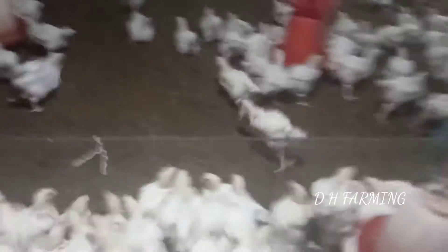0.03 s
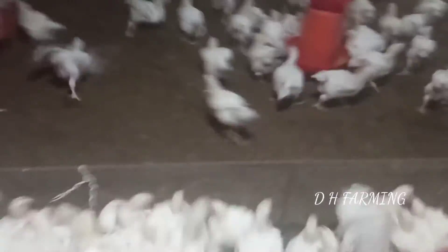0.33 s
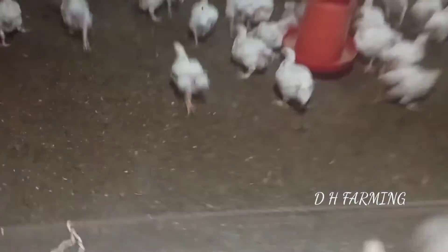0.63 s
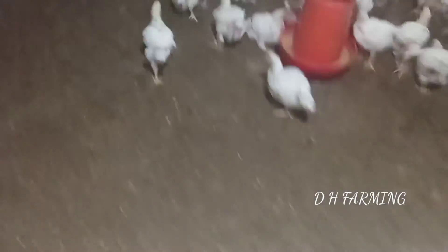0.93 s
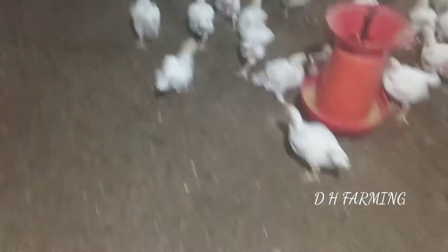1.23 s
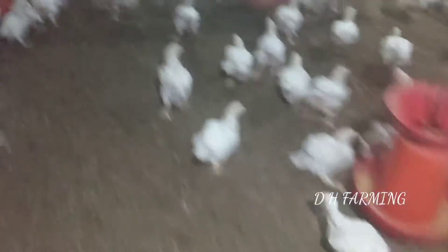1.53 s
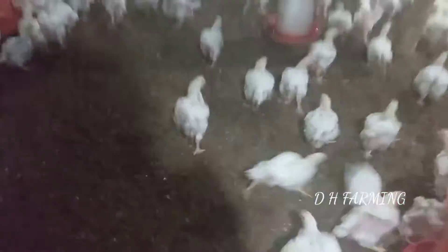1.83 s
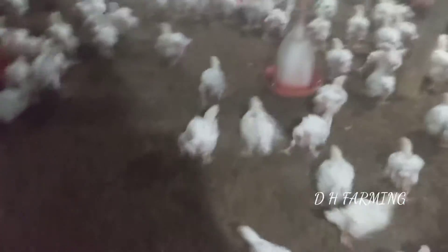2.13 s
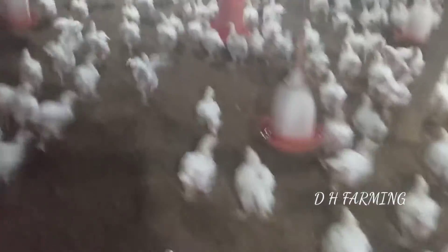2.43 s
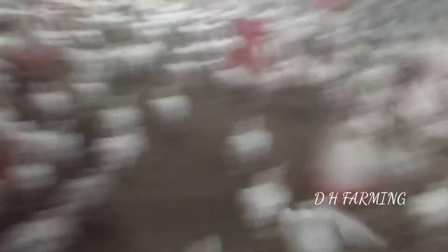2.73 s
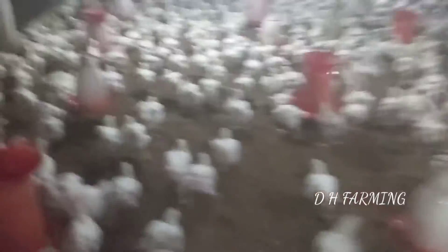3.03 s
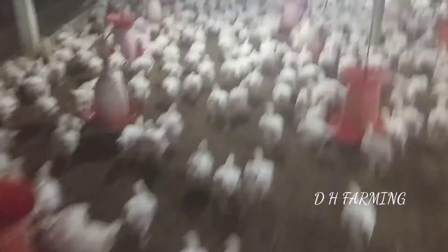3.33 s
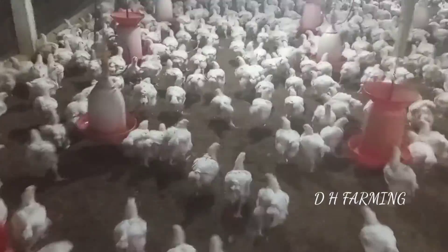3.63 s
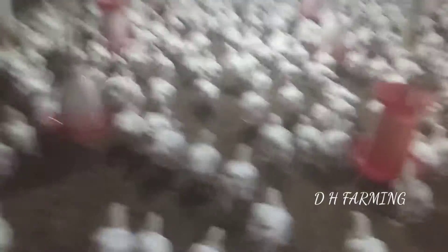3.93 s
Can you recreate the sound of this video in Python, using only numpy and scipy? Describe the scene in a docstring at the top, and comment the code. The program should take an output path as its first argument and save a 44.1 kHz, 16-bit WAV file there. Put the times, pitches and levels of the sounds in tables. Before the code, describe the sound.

A flock of young chickens peeping hoarsely in a big shed, gradually settling down.

```python
"""Young chickens close to the microphone, in a large shed: each syrinx gives arched, hoarse peeps,
abrupt pips or a few low nasal clucks. Further off, the rest of the flock is a chorus that thins out
as the birds settle. Feet patter on the litter, a few dull thumps on something hollow sound close by,
and the hall answers the calls and thumps. Heard in mono from among the birds."""
import sys
import numpy as np
from scipy import signal
from scipy.fft import rfft, irfft, next_fast_len
from scipy.io import wavfile
from scipy.ndimage import map_coordinates

SR = 44100
rng = np.random.default_rng(int(sys.argv[2]) if len(sys.argv) > 2 else 0)


def persist_wave(psi):
    """Save psi, clipped to +-1, as 16-bit WAV."""
    counts = np.round(np.clip(psi, -1, 1) * 32767).astype(np.int16)
    wavfile.write(sys.argv[1], SR, np.atleast_2d(counts).T)


N = 176400
TOP_HZ = 15600  # the recorder's band limit


def amp(db):
    """Decibels to gain."""
    return 10 ** (np.asarray(db) / 20)


def unit(x):
    """Scaled to rms 1."""
    return x / np.sqrt(np.mean(x ** 2) + 1e-20)


def along(points, hz):
    """Read (frequency [Hz], value) points on a log frequency axis."""
    freqs, values = np.transpose(points)
    return np.interp(np.log(hz + 1), np.log(freqs + 1), values)


def level(rows):
    """Gain per sample from (time [s], level [dB]) rows."""
    return amp(np.interp(np.arange(N) / SR, *np.transpose(rows)))


def wobble(rate, size):
    """A smooth random curve, rate knots a second."""
    knots = rng.standard_normal(256 if size < N else 16384)
    return map_coordinates(knots, [np.arange(size) * rate / SR], mode='wrap', order=2)


def filtered(x, response):
    """x through a gain given as a function of frequency."""
    size = next_fast_len(len(x) + 8192)
    return irfft(rfft(x, size) * response(np.fft.rfftfreq(size, 1 / SR)), size)[:len(x)]


def coloured(x, points):
    """x through a (frequency [Hz], gain [dB]) curve."""
    return filtered(x, lambda hz: amp(along(points, hz)))


def add(track, s, sound):
    """Mix a sound in at time s."""
    start = round(s * SR)
    part = sound[max(-start, 0):max(N - start, 0)]
    track[max(start, 0):][:len(part)] += part


def swell(call, skew=0.8):
    """A call rises and fades in one arch; with skew under 1 the rise is the faster."""
    return call * np.abs(np.sin(np.pi * np.linspace(0, 1, len(call)) ** skew)) ** 0.76


def shed(x):
    """The hall's diffuse answer, dying soonest in the top treble."""
    # reverberation of the hall (frequency [Hz], time to fall 60 dB [s])
    t60 = [(200, 0.53), (2000, 0.94), (6000, 1), (14000, 0.11)]
    hz, t, noise = signal.stft(rng.standard_normal(SR // 2), SR, nperseg=256)
    tail = signal.istft(noise * amp(-60 * t / along(t60, hz)[:, None]), SR, nperseg=256)[1]
    delayed = np.pad(x, (400, 0))
    return signal.fftconvolve(delayed, tail / np.linalg.norm(tail))[:N]


def walls(x, count=8):
    """Early echoes reach the microphone from the floor, feeders and roof."""
    out = np.zeros(N)
    for delay_s, sign in zip(rng.uniform(0.002104, 0.024, count), rng.choice([-1, 1], count)):
        add(out, delay_s, sign * x / np.sqrt(count))
    return out


def litter(settle_from_s=0.84, fade_db_per_s=4):
    """Many feet on the shed floor: a soft low patter and a crisp rustle that fades as they settle."""
    # loudness of the footfalls (time [s], level [dB])
    patter_levels = [(0.0, -42), (0.31, -39), (0.82, -39.5), (0.93, -35), (0.98, -42), (2.35, -45),
                     (2.47, -50.5), (4.0, -48)]
    # spectrum of the footfalls (frequency [Hz], gain [dB])
    patter_colour = [(25, -50), (50, -16), (90, -8), (135, -2), (220, 0), (350, 1), (550, -8), (1000, -6.5),
                     (2500, -4), (8000, -58)]
    # spectrum of the stirred litter (frequency [Hz], gain [dB])
    rustle_colour = [(60, -44), (500, 1), (2000, 15), (4000, -12.5), (6500, 2.5), (8000, -7.5), (9700, 0),
                     (11500, -10.5), (13700, -18.5), (15000, -4), (15600, -14)]
    patter = unit(coloured(rng.standard_normal(N) * amp(3.45 * wobble(55, N)), patter_colour))
    crackle = amp(2.3 * wobble(900, N) + 3.1 * wobble(35.1, N))
    rustle = unit(coloured(rng.standard_normal(N) * crackle, rustle_colour))
    settled_s = np.maximum(np.arange(N) / SR - settle_from_s, 0)
    return amp(2) * level(patter_levels) * patter + amp(-41 - fade_db_per_s * settled_s) * rustle


def scuffs(rise_s=0.0014, t60_s=0.096):
    """Feet scrape the litter near the microphone: sharp bursts of gritty noise."""
    # single scrapes (time [s], level [dB])
    scrapes = [(.092, -31.5), (1.174, -29), (1.203, -33), (1.525, -34.5), (1.591, -33), (1.715, -30.5),
               (2.047, -34.5), (2.298, -38)]
    # spectrum of a scrape (frequency [Hz], gain [dB])
    grit_colour = [(40, -50), (250, 3), (600, 10.5), (1200, 0.5), (4000, -10.5), (10000, -9.5),
                   (13000, -19), (15500, -19)]
    out, t = np.zeros(N), np.arange(SR // 10) / SR
    for s, db in scrapes:
        grit = unit(coloured(rng.standard_normal(len(t)), grit_colour))
        add(out, s, grit * amp(db - 60 * t / t60_s) * (1 - np.exp(-t / rise_s)))
    return out


def thumps(rise_s=0.013, ring_t60_s=0.089, puff_t60_s=0.04):
    """Soft blows on something hollow close by: one damped low mode and a puff."""
    # dull blows (time [s], pitch [Hz], level [dB])
    blows = [(.274, 230, -17.5), (.432, 194, -21), (.910, 225, -19), (3.129, 174, -33.5), (3.221, 164, -31)]
    puff_colour = [(40, -51), (400, 9), (700, -12.0), (3000, -28)]  # (frequency [Hz], gain [dB])
    out, t = np.zeros(N), np.arange(SR // 4) / SR
    for s, hz, db in blows:
        ring = np.sin(2 * np.pi * hz * t) * (1 - np.exp(-t / rise_s)) * amp(3 - 60 * t / ring_t60_s)
        puff = unit(coloured(rng.standard_normal(len(t)), puff_colour))
        add(out, s, amp(db) * (ring + puff * amp(-11.5 - 60 * t / puff_t60_s)))
    return out


def syrinx(length, hz, glide, rough, gains, arch, rasp, waver, stutter_hz=115):
    """One call: an arched glide of harmonics; roughness makes it stutter and the syrinx's sides beat."""
    size = int(max(length, .01) * SR)
    position = np.linspace(-.5, .5, size)
    # the pitch droops either side of the middle by arch [octaves/s^2]
    pitch = hz * 2 ** (glide * position - arch * (position * length) ** 2)
    pitch *= 1 + waver * wobble(128, size) + rasp * rough * wobble(717.0, size)
    phase = 2 * np.pi * np.cumsum(pitch) / SR
    tone = np.zeros(size)
    for k, gain in enumerate(gains, 1):
        fray_rad = .00014 * (k - 1) * hz * wobble(260, size)  # higher harmonics fray more
        flicker_db = (4.5 if k > 1 else 2) * wobble(174.6, size)
        tone += (k * hz < TOP_HZ) * gain * unit(amp(flicker_db)) * np.sin(k * phase + fray_rad)
    beat_ratio = .25 * np.exp(.3 * rng.standard_normal())
    beating = np.exp(2 * rough * amp(-1.5) * np.sin(beat_ratio * phase))
    pulses = rng.random() + np.cumsum(stutter_hz * np.exp(.35 * wobble(stutter_hz, size))) / SR
    stutter = amp(12 * np.sqrt(abs(rough)) * np.abs(np.sin(np.pi * pulses)))
    return tone * unit(stutter * beating)


def peep(length, hz, glide, overtones_db, rough, fall_db=9.5, scatter_db=3):
    """A strong fundamental with overtones that fall off, differently from bird to bird."""
    gains = np.r_[1, amp(overtones_db - fall_db * np.arange(4) + scatter_db * rng.standard_normal(4))]
    return syrinx(length, hz, glide, rough, gains, arch=130.6, rasp=0.09, waver=0.01704)


def chorus(calls_per_s=75, centre_hz=2360, spread_oct=.25, sag_oct_per_s=.06):
    """Birds further off peep at random, a little lower as they calm; the farthest merge into a blur."""
    # loudness of the settling flock (time [s], level [dB])
    flock_levels = [(0.0, -24.5), (1.61, -28.5), (2.0, -30), (2.33, -33), (3.06, -47), (3.19, -42.5),
                    (3.9, -46), (4.0, -51)]
    # colour of the birds' throats (frequency [Hz], gain [dB])
    throat = [(1300, -7), (1750, 2.5), (2200, 0.5), (3200, -1.5), (4500, -4), (6500, 2), (8000, 0.5),
              (10000, 9), (12500, -1), (15500, -5)]
    # spectrum of the farthest birds (frequency [Hz], gain [dB])
    far_colour = [(80, -32), (600, -12), (780, -6.5), (1050, -10), (1450, 6), (2100, 7), (2700, -5.5),
                  (3600, -8.5), (6000, -23), (12000, -36)]
    # brief lulls in the chorus (time [s])
    lulls = [1.765, 1.868, 2.0, 2.351, 2.509, 2.645, 2.925, 3.105, 3.53, 3.731]
    lull_db, lull_width_s = 6, 0.021
    calls, t = np.zeros(N), np.arange(N) / SR
    for i in range(int(calls_per_s * N / SR)):
        stretch, height, loudness, bend, jitter, brightness = rng.standard_normal(6)
        s = (i + .5 * jitter) / calls_per_s
        length = .038 * np.exp(.25 * stretch)
        hz = centre_hz * 2 ** (spread_oct * height - sag_oct_per_s * s)
        call = peep(length, hz, glide=-.1 + 0.202 * bend, overtones_db=-15 + 2.5 * brightness, rough=0.23)
        add(calls, s - length / 2, amp(2.3 * loudness - 0.43 * height ** 2) * swell(call))
    calls = coloured(calls, throat)
    blur = unit(coloured(rng.standard_normal(N), far_colour))
    in_hall = unit(calls + 0.5 * shed(calls))
    dips = amp(-lull_db * sum(np.exp(-((t - s) / lull_width_s) ** 2) for s in lulls))
    return level(flock_levels) * dips * (amp(-1.5) * in_hall + amp(-11) * blur)


def clucks():
    """Low nasal clucks close by: sixteen harmonics shaped by the throat."""
    # clucks (middle [s], length [s], pitch [Hz], glide [octaves], level [dB],
    # fundamental [dB], roughness [0-1])
    calls = [(0.062, 0.053, 721, -0.17, -37, 1, 0.16), (0.74, 0.044, 707, -0.085, -31, -3.5, 0.16),
             (0.784, 0.073, 775.6, -0.19, -33.5, 1.5, 0.16), (0.864, 0.045, 821, 0.04, -32, -1.5, 0.23),
             (1.055, 0.064, 736, 0.18, -35, -4, 0.08), (1.104, 0.057, 745, -0.016, -31, -7, 0.07),
             (1.154, 0.054, 759, -0.15, -38.5, 5, 0.16), (1.328, 0.048, 767, -0.019, -39.5, 2, 0.2),
             (1.51, 0.044, 712, -0.133, -42, 6, 0.16), (1.78, 0.021, 786, 0.15, -45.5, 5, 0.1),
             (1.833, 0.047, 765, 0.11, -45, 6, 0.05), (3.919, 0.07, 730.6, -0.044, -43.5, -5.5, 0.18)]
    # resonances of the throat (frequency [Hz], gain [dB])
    throat = [(750, 4), (1500, 1), (2300, 4), (3000, 4.5), (3800, -1.5), (4600, -10), (6500, -11.5),
              (8000, -17.5), (10000, -12), (13000, -34)]
    out = np.zeros(N)
    for s, length, hz, glide, db, fundamental_db, rough in calls:
        gains = amp(along(throat, hz * np.arange(1, 17)) + 0.93 * rng.standard_normal(16))
        gains[0] *= amp(fundamental_db)
        cluck = syrinx(length, hz, glide, rough, gains, arch=36.5, rasp=0.11, waver=0.0277)
        add(out, s - length / 2, amp(db - 1) * swell(cluck))
    return out


def pips(rise_s=0.0023, t60_s=0.059):
    """Abrupt pips of the closest birds: short falling peeps that start sharply and die away."""
    # pips (start [s], pitch [Hz], level [dB])
    calls = [(.099, 2200, -30), (.163, 2330, -19.5), (.455, 2140, -24), (.776, 2450, -15),
             (.989, 2296, -13), (1.027, 2235, -19.5), (1.117, 2152, -19.5), (2.359, 2126, -22.5),
             (2.377, 2137, -21), (2.467, 2110, -22), (2.525, 1988, -22.5), (2.597, 1960, -24),
             (2.674, 2270, -20), (2.962, 2750, -24.5), (2.982, 2100, -26.5), (3.050, 2357, -23.5),
             (3.150, 1983, -27.5), (3.174, 2033, -22), (3.277, 2290, -26), (3.290, 2320, -24.5),
             (3.577, 2150, -31)]
    out = np.zeros(N)
    for s, hz, db in calls:
        pip = peep(t60_s / 2, hz, glide=-.2, overtones_db=-20.5, rough=0.17)
        t = np.arange(len(pip)) / SR
        add(out, s, pip * amp(db - 60 * t / t60_s) * (1 - np.exp(-t / rise_s)))
    return out


def peeps():
    """Hoarse peeps close to the microphone, each arched in pitch and loudness."""
    # peeps (middle [s], length [s], pitch [Hz], glide [octaves], level [dB],
    # overtones [dB], roughness [0-1])
    calls = [(0.026, 0.068, 2248, -0.3, -25.5, -15, 0.22), (0.024, 0.051, 3040, -0.15, -30, -26, 0.14),
             (.225, 0.041, 2380, 0.07, -29, -14, 0.31), (0.267, 0.047, 2644, 0.09, -26.5, -25, 0.26),
             (0.306, 0.047, 3156, -0.08, -25.5, -22, 0.3), (0.335, 0.069, 2360, .05, -27.5, -14, 0.1),
             (0.35, 0.038, 3124, -0.1, -26.5, -34, 0.2), (0.454, 0.073, 2140, -.25, -30, -4, 0.5),
             (0.601, 0.024, 2990, .2, -27, -21, 0.7), (0.552, 0.073, 2375, .05, -39, 5.5, 0.47),
             (0.658, 0.082, 2430, -0.13, -25.5, -13, 0.15), (0.706, 0.043, 2970, 0.04, -24.5, -23, 0.3),
             (.895, 0.047, 2160, 0.05, -28.5, -8, 0.59), (0.969, 0.034, 2943, -.05, -26.5, -20, 0.12),
             (1.246, 0.033, 2750, 0.1, -25.5, -34, 0.46), (1.257, 0.05, 2110, -.15, -30, -19, 0.42),
             (1.363, 0.079, 2416, -0.16, -25.5, -26, 0.19), (1.417, 0.071, 2434, -0.3, -28, -26, 0.06),
             (1.471, 0.066, 1987, -0.54, -28, -42, 0.11), (1.538, 0.089, 2606, -0.23, -30, -31, 0.02),
             (1.586, 0.036, 3570, 0.5, -30, -30, 0.42), (1.65, 0.059, 2200, -0.03, -26.5, -15, 0.58),
             (1.695, 0.026, 3020, 0.2, -29, -16, 0.15), (1.735, 0.044, 2368, -.1, -27.5, -15.5, 0.3),
             (1.788, 0.038, 1688, .1, -33.5, -4.5, 0.15), (1.827, 0.041, 1978, -0.39, -23.5, -44, 0.14),
             (1.911, 0.048, 2385, -0.37, -33.5, -21, 0.1), (1.945, 0.041, 1476, -.7, -36, -3, 0.25),
             (1.955, 0.035, 2300, .1, -25, -14.5, 0.26), (2.001, 0.029, 3780, -0.32, -32.5, -28, 0.25),
             (2.087, 0.061, 2430, -0.4, -27, -16.5, 0.3), (2.166, 0.03, 1947, .1, -34.5, -30, 0),
             (2.25, 0.042, 2045, -0.15, -29, -11, 0.41), (2.33, 0.041, 2580, -.1, -34.5, -14, 0.29),
             (2.396, 0.07, 2090, -0.2, -31, -16.5, 0.36), (2.486, 0.04, 1919, -.2, -33.5, -20, 0.49),
             (2.551, 0.034, 2045, -.05, -31, -4.5, 0.24), (2.703, 0.069, 2200, -0.25, -40, -11, 0.38),
             (2.751, 0.035, 1525, -0.51, -38.5, -7, 0), (2.779, 0.056, 2144, -0.12, -37, -6, 0.65),
             (2.799, 0.038, 2273, -0.06, -36.5, -20, 0.12), (2.845, 0.046, 1983, -0.03, -38, -13, 0.17),
             (2.876, 0.033, 1697, -0.16, -37.5, -20, 0.24), (2.981, 0.065, 2204, -0.1, -35, -9, 0.4),
             (3.046, 0.053, 1713, .1, -39.5, -4, 0.35), (3.063, 0.035, 1950, -.6, -35.5, -12.5, 0.28),
             (3.175, 0.045, 2110, -0.1, -46, -11, 0.33), (3.208, 0.026, 1450, -0.33, -38.5, -24, 0),
             (3.238, 0.025, 3290, 0.12, -42, -26, 0.27), (3.276, 0.072, 2340, -0.43, -32.5, -23, 0.24),
             (3.352, 0.039, 1624, -0.6, -37.5, -15, 0), (3.36, 0.091, 2316, -0.25, -35, -9.5, 0.39),
             (3.394, 0.024, 3550, 0.17, -34, -31, 0.1), (3.41, 0.058, 2785, 0.2, -43, -4.5, 0.2),
             (3.438, 0.042, 2450, -.3, -39.5, -6, 0.52), (3.476, 0.034, 1463, -0.03, -44, -10, 0.06),
             (3.492, 0.047, 2054, -0.07, -41.5, -10, 0.6), (3.581, 0.052, 2208, 0.1, -37.5, -8.5, 0.36),
             (3.694, 0.065, 2157, 0.08, -41, -6.5, 0.56), (3.775, 0.079, 1995, -0.28, -45, -11, 0.67),
             (3.811, 0.045, 1712, -.2, -42.5, -12, 0.54), (3.857, 0.037, 1705, -.1, -44.5, -2.5, 0.45)]
    out = np.zeros(N)
    for s, length, hz, glide, db, overtones_db, rough in calls:
        add(out, s - length / 2, amp(db) * swell(peep(length, hz, glide, overtones_db, rough)))
    return out


def near_birds():
    """The birds around the microphone: peeps and pips share one colour, clucks have their own."""
    # colour of the high calls (frequency [Hz], gain [dB])
    peep_colour = [(1000, 8), (3200, -1), (4500, -5), (6500, -0.5), (8000, -4), (10000, 5.5), (12500, -8),
                   (15500, -6)]
    return amp(2.5) * coloured(peeps() + pips(), peep_colour) + clucks()


def scene():
    """Near birds and thumps with the hall's answer, over the chorus and the feet on the litter."""
    near = near_birds() + thumps()
    hall = amp(-11) * walls(near) + amp(-18.5) * shed(near)
    return (near + hall + chorus() + litter() + scuffs())[None]


def record(dry):
    """One microphone, into a recorder that keeps nothing above its band limit."""
    return filtered(dry[0], lambda hz: hz < TOP_HZ)[None]


dry = scene()
out = record(dry)
persist_wave(out)
```